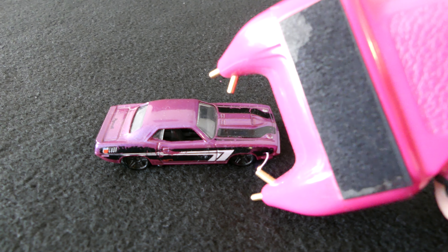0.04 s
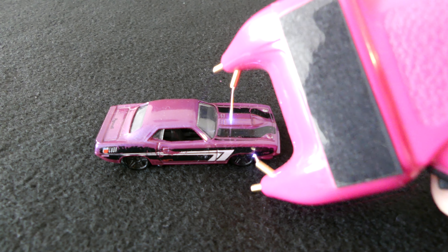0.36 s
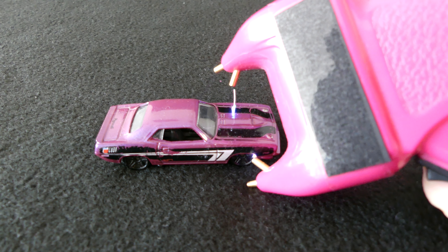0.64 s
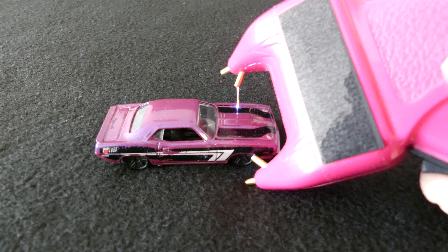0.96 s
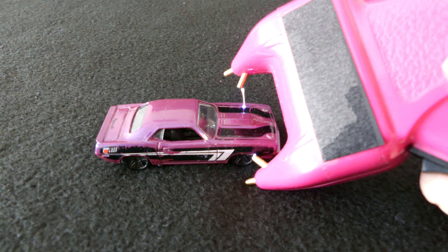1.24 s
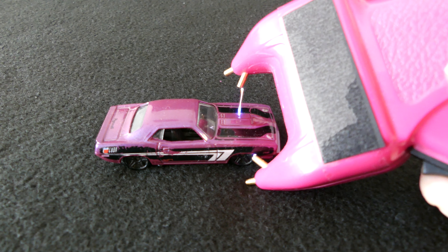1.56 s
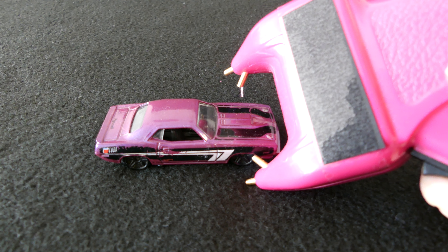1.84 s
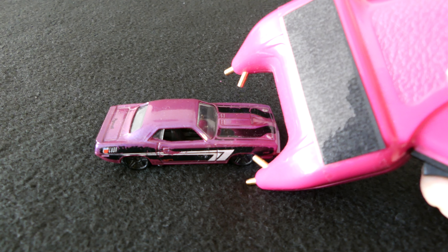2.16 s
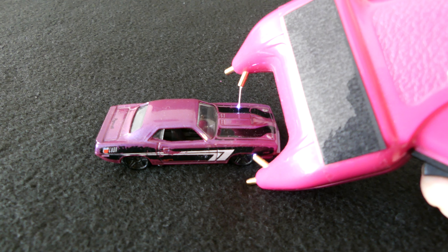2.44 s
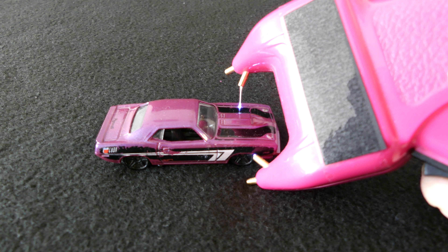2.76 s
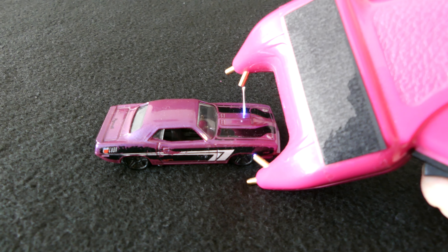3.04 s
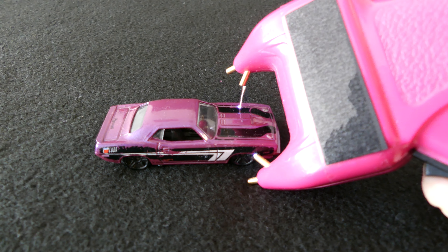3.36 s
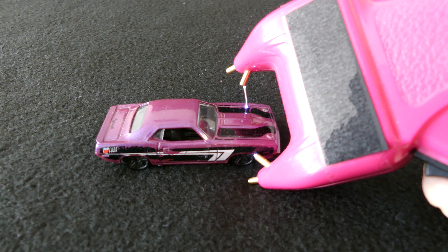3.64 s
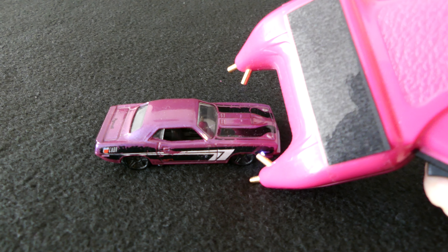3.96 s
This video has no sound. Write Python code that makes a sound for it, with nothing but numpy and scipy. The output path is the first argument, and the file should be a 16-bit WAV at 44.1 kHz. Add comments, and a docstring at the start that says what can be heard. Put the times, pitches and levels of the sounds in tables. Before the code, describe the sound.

A stun gun snaps rapidly and evenly, with loud, sharp electric sparks in a small room.

```python
"""A small room hisses faintly, and a hand makes a low handling rumble that goes on throughout. A handheld stun
device gives a short, high whine as it charges up. Then it sparks to a toy car about fifteen times a second.
Each spark's snap reaches the microphone directly and off a nearby surface, rings the microphone's opening and
overloads the recorder. After each snap the room rings on, fading into the next one."""
import sys
import numpy as np
from scipy import signal
from scipy.fft import rfft, irfft
from scipy.io import wavfile

SR = 44100
rng = np.random.default_rng(int(sys.argv[2]) if len(sys.argv) > 2 else 0)


def to_wav(s):
    """Save 16-bit WAV."""
    ch = np.atleast_2d(s).T  # columns
    pcm = np.round(np.clip(ch, -1, 1) * 32767)  # PCM
    wavfile.write(sys.argv[1], SR, pcm.astype(np.int16))


N = 176400

# how the hand's rumble swells and fades: t/s, relative level/dB
RUMBLE_LEVELS = [(0.0, -50), (0.04, -47), (0.15, -65), (0.19, -60), (0.58, -61), (0.6, -78), (0.79, -73),
                 (1.0, -48), (1.04, -52), (2.35, -62), (2.61, -56), (4.0, -71.5)]
# tone of the room's hiss: f/Hz, relative level/dB
HISS_TONE = [(20, 3), (60, -18.5), (150, -15), (400, -17), (900, -16.5), (2000, -28), (8000, -31),
             (16000, -31)]
# one row a spark: t/s, relative level/dB, brightness/dB per octave, bite/dB, low pop/dB
SPARK_TRAIN = [(0.0924, 12.5, -3.5, 6.5, 1.5), (0.1522, 2.5, 0, 7.5, 9), (0.214, -1, -6, 5, -3),
               (0.2746, 0.5, -2.5, 6, 0.5), (0.3336, -0.5, -3, 6, -2.5), (0.3884, 0, -2.5, 3, -0.5),
               (0.4513, -0.5, -1, 7.5, -4), (0.5079, -0.6, -0.5, 1.5, 4), (0.5658, -1.1, 0.8, 2, 2),
               (0.6275, -3, -2.5, 4, -2.5), (0.6881, -2, 2.2, 7.5, 5.5), (0.7442, -0.5, 0.9, -1.5, 1.5),
               (0.8, -0.8, 1, 1.5, 1), (0.8585, -0.5, 3, 4, 1.5), (0.9215, -1.3, 0, 2.5, -3.5),
               (0.9814, -0.5, 0.2, -1.5, 4.5), (1.0482, 3, -0.8, -0.5, -2.5), (1.1065, -0.5, 0.1, 1, 1),
               (1.1654, 1, -1.1, 0.5, -6.5), (1.2293, 0.1, -1, -1.5, 1), (1.2867, -1, -0.4, -2.0, 3),
               (1.3451, -0.5, -0.5, -0.0, 0), (1.4079, 2.3, -1.7, -0.5, -4.5), (1.4674, 0, 0.1, 0.5, -1),
               (1.5302, 1, -1, 0.5, -2), (1.5926, 2.5, -2, 0.5, -3), (1.6595, -0.2, -0.5, -2, 2.5),
               (1.7212, -0.3, 1, 2, -1.5), (1.7862, 2.0, -2, 1.0, -5.5), (1.8493, 0.1, -1.0, 0.5, -3),
               (1.91, -1, -0.3, 0.5, 0.5), (1.972, -1, 0.5, 2, -3.0), (2.0321, 1.1, 0.1, 1, -1.5),
               (2.0964, -1, -0.2, 1.5, -1.5), (2.159, 0.1, 0, 0.5, 0), (2.2247, -0.7, 0.4, 0.5, 1.0),
               (2.2946, 0, 0, 1, -1.0), (2.3636, -0.7, 0.3, -0.5, -2), (2.4267, -0.8, -0.4, -0.0, -1.0),
               (2.4857, -0.8, 0.5, -2.5, 3.5), (2.546, 0.3, 0.0, 1, -1.5), (2.6094, -1, 0.5, -1.5, 3.0),
               (2.6772, -1.0, 0.3, 2, -3), (2.7399, -0.5, -0.4, 0.5, -3.5), (2.8021, -2.7, 1.4, 1.5, 3),
               (2.8708, -2, 0.5, 0.5, 4), (2.9354, 0.7, 3, -9.5, -3.5), (3.0067, -0.5, 0.5, 0, 0.5),
               (3.0719, -1.4, 1, -0.5, 0), (3.136, -0.5, -0.4, 1.5, -3), (3.2036, -1.4, 0.8, -1, -0.5),
               (3.2714, -1.5, 0.8, -1.0, 1.5), (3.3387, -1, -0.0, 0.5, -2.5), (3.4077, -1.3, 0.8, -0.5, 0),
               (3.4772, -4, -1.2, 0.5, 0.5), (3.5448, -2.4, 1.7, 2, 2), (3.6103, -1.6, 0.2, 1, -1.0),
               (3.6744, -2.5, 2, -0.0, 3.5), (3.7428, -2, 1.7, -0.0, 3), (3.8027, -3.5, 1, 3.5, -8),
               (3.8695, -2.0, 1.4, -1.0, 1.5), (3.9358, -2.5, 1.5, -0.5, 1.5)]
# bounces off surfaces next to the spark: delay/ms, level/dB
NEAR_BOUNCES = [(0.594, 0), (1.182, -33.5)]
# tone of a snap after the microphone's opening: f/Hz, level/dB
SNAP_TONE = [(40, -10), (150, -10.5), (550, -1.5), (950, 8), (2000, 12.5), (2650, 11), (3450, 13.5),
             (4300, 15.5), (5200, 17.5), (6600, 11), (8000, 9.5), (10000, 10.5), (12500, 15), (14000, -3.5),
             (16000, 3)]
# first echoes off furniture and walls: delay/ms, spread/ms, level/dB
WALL_ECHOES = [(1.4, 0.68, -3), (3.9, 0.17, -6), (8.2, 0.83, -9), (10.6, 0.1, -14), (12.9, 0.5, -14)]
# tone of the room's echo: f/Hz, level/dB
ECHO_TONE = [(60, -18), (200, -18.5), (400, -11.5), (620, -9.5), (870, -3.5), (1150, -6.5), (2000, -3),
             (2700, -5), (3500, -4), (5000, -1.5), (6200, -5), (9000, -5.5), (12500, -6), (15500, -10)]
# pitches the room rings at: f/Hz, sharpness/Q, level against the echo/dB
ROOM_RINGS = [(856, 35, 2.5), (941, 28, -1), (1783, 59, 0), (3420, 100, 0)]
# how wide the echo spreads between left and right: f/Hz, relative level/dB
ECHO_WIDTH = [(100, 11), (300, 10), (1000, -4), (3000, -2), (8000, 3), (14000, 5.5)]
# tone of the recorder after its input: f/Hz, level/dB
RECORDER_TONE = [(25, 2), (150, -1), (450, -1), (900, 1), (4000, -0.5), (9000, -0.5), (16000, -1)]


def amp(db):
    """Turn decibels into a number to multiply by."""
    return 10 ** (np.asarray(db) / 20)


def unit(x):
    """Scale a sound to an average strength (rms) of 1."""
    return x / np.sqrt(np.mean(x ** 2))


def causal(db):
    """Spectrum of the shortest pulse with these levels and no sound before its start."""
    cepstrum = irfft(np.log(amp(db)))
    half = len(cepstrum) // 2
    folded = np.r_[cepstrum[0], 2 * cepstrum[1:half], cepstrum[half], np.zeros(half - 1)]
    return np.exp(rfft(folded))


def colour(x, points, size=2048):
    """Give a sound the tone drawn by rows of f/Hz, level/dB."""
    point_hz, point_db = np.array(points, float).T
    hz = np.fft.rfftfreq(size, 1 / SR)
    db = np.interp(np.log(hz + 1), np.log(point_hz), point_db)
    return signal.fftconvolve(x, irfft(causal(db)))[:len(x)]


def resonance(hz, centre_hz, q):
    """How something that rings at centre_hz answers each pitch; a higher q is narrower."""
    s = 1j * hz / centre_hz
    return s / q / (1 + s / q + s * s)


def add(track, start, sound):
    """Mix a sound in from a given sample."""
    part = sound[:len(track) - start]
    track[start:start + len(part)] += part


def rumble_and_hiss(t, rumble_hz=21.5, rumble_boost_db=3, hiss_db=-53.5):
    """The hand makes a deep, uneven rumble while the room's air hisses steadily."""
    times, levels = np.array(RUMBLE_LEVELS).T
    lowpass = signal.butter(4, rumble_hz, fs=SR, output="sos")
    rumble = unit(signal.sosfilt(lowpass, rng.standard_normal(N)))
    hiss = unit(colour(rng.standard_normal(N), HISS_TONE))
    return amp(rumble_boost_db + np.interp(t, times, levels)) * rumble + amp(hiss_db) * hiss


def charging_whine(t, start_s=0.036, rise_s=0.0037, level_db=-51):
    """The charging circuit's pitch shoots up, then sags until the first spark cuts it off."""
    aim_hz, sweep_hz, sag_hz_per_s = 11500, 2630, 8300
    age = np.maximum(t - start_s, 0)
    rise = 1 - np.exp(-age / rise_s)
    hz = aim_hz - sweep_hz * (1 - rise) - sag_hz_per_s * age
    tone = np.sqrt(2) * np.sin(2 * np.pi * np.cumsum(hz) / SR)
    charging = t < SPARK_TRAIN[0][0]
    return amp(level_db) * rise * charging * tone


def spark(level_db, brightness, bite_db, pop_db, boost_db=1.5):
    """One spark's snap; a longer spark is duller and bites harder in the upper middle pitches."""
    tilt_from_hz, pivot_hz, tilt_to_hz = 2680, 5400, 12100
    bite_hz, bite_width_hz, pop_hz = 3650, 340, 1510
    hz = np.fft.rfftfreq(256, 1 / SR)
    tilt = brightness * np.log2(np.clip(hz, tilt_from_hz, tilt_to_hz) / pivot_hz)
    bite = bite_db * np.exp(-.5 * ((hz - bite_hz) / bite_width_hz) ** 2)
    pop = pop_db / (1 + (hz / pop_hz) ** 2)
    return irfft(causal(boost_db + level_db + tilt + bite + pop))


def close_snap(pulse, delay_stretch, bounce_hz=6660, opening_hz=5650, size=512):
    """The pulse and its thinner-sounding nearby bounces ring the microphone's opening."""
    hz = np.fft.rfftfreq(size, 1 / SR)
    bounces = sum(amp(db) * np.exp(-2j * np.pi * hz * delay_stretch * ms / 1000)
                  for ms, db in NEAR_BOUNCES)
    bounce_band = np.abs(resonance(hz, bounce_hz, q=1)) ** 2
    # the opening delays the pitches it rings at, without making them louder
    warped_pitch = np.tan(np.pi * hz / (SR + 1))
    opening = 2 * resonance(warped_pitch, np.tan(np.pi * opening_hz / SR), q=0.86) - 1
    path = irfft(opening * (1 + bounces * bounce_band))
    return np.convolve(pulse, path[:size // 2])


def echo_fade(fade_s, size, tail_db=-2, tail_rise_s=0.018):
    """The echo's strength over time: first wall echoes, then a tail that falls 60 dB in fade_s."""
    def at_level(power, db):
        """Scale a burst so that its total energy is db."""
        return power / power.sum() * amp(db) ** 2

    t = np.arange(size) / SR
    ms = t * 1000
    early = sum(at_level((ms >= delay) * np.exp(-np.abs(ms - delay) / spread), db)
                for delay, spread, db in WALL_ECHOES)
    tail = (1 - np.exp(-t / tail_rise_s)) * np.exp(-2 * np.log(1000) * t / fade_s)
    return np.sqrt(early + at_level(tail, tail_db))


def room_ringing(echoes, gain=0.88):
    """The room holds on to a few narrow pitches, so they ring out of the echo."""
    hz = np.fft.rfftfreq(2 * N, 1 / SR)
    lift = 1 + sum(amp(db) * resonance(hz, ring_hz, q) for ring_hz, q, db in ROOM_RINGS)
    return gain * irfft(rfft(echoes, 2 * N) * lift)[:N]


def snaps_and_echoes(wander=0.015, early_boost_db=2, settle_s=0.47, size=16384):
    """All the sparks, close up and through the room. Their hopping about varies bounces and echoes."""
    vary_above_hz, fade_split_hz = 4960, 14000
    slow_fade, fast_fade = echo_fade(0.6, size), echo_fade(0.5, size)
    hz = np.fft.rfftfreq(size, 1 / SR)
    steady_share = 1 / (1 + (hz / vary_above_hz) ** 2)  # low echoes stay alike from snap to snap
    slow_share = 1 / (1 + (hz / fade_split_hz) ** 2)  # the highest pitches die sooner
    steady_noise = rfft(rng.standard_normal(size))
    snaps, echoes = np.zeros(N), np.zeros(N)
    for start_s, level_db, brightness, bite_db, pop_db in SPARK_TRAIN:
        pulse = spark(level_db, brightness, bite_db, pop_db)
        fresh_noise = rfft(rng.standard_normal(size))
        scatter = np.sqrt(steady_share) * steady_noise + np.sqrt(1 - steady_share) * fresh_noise
        room = slow_fade * irfft(scatter * slow_share) + fast_fade * irfft(scatter * (1 - slow_share))
        delay_stretch = 1 + wander * rng.standard_normal()
        # the first snaps sound louder and harsher, then settle
        early_gain = amp(early_boost_db / (1 + (start_s / settle_s) ** 8))
        add(snaps, int(start_s * SR), early_gain * close_snap(pulse, delay_stretch))
        add(echoes, int(start_s * SR), signal.fftconvolve(room, pulse))
    return colour(snaps, SNAP_TONE), room_ringing(colour(echoes, ECHO_TONE))


def scene(background_side_db=-14.5, echo_side_db=-22.5):
    """Whine and snaps sit in the centre; rumble, hiss and echo spread a little to the sides."""
    t = np.arange(N) / SR
    snaps, echoes = snaps_and_echoes()
    centre = rumble_and_hiss(t) + charging_whine(t) + snaps + echoes
    wide_echoes = signal.hilbert(colour(echoes, ECHO_WIDTH)).imag  # each wave shifted a quarter turn
    side = amp(background_side_db) * rumble_and_hiss(t) + amp(echo_side_db) * wide_echoes
    return np.array([centre + side, centre - side])


def record(dry, clip_level=0.9, top_hz=16200):
    """The snaps overload the recorder: it flattens their peaks, tints the tone and cuts the very top."""
    clipped = np.clip(dry, -clip_level, clip_level)
    tinted = np.array([colour(channel, RECORDER_TONE) for channel in clipped])
    top_cut = signal.firwin(151, top_hz, fs=SR, window=("kaiser", 7))
    return signal.fftconvolve(tinted, top_cut[None], mode="same", axes=1)


dry = scene()
out = record(dry)
to_wav(out)
```